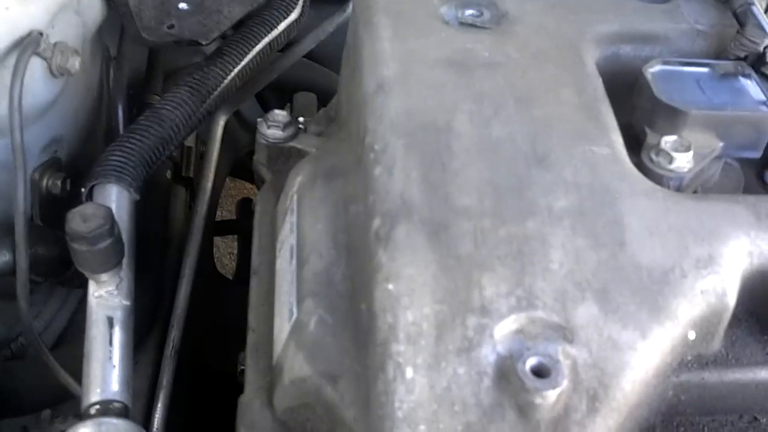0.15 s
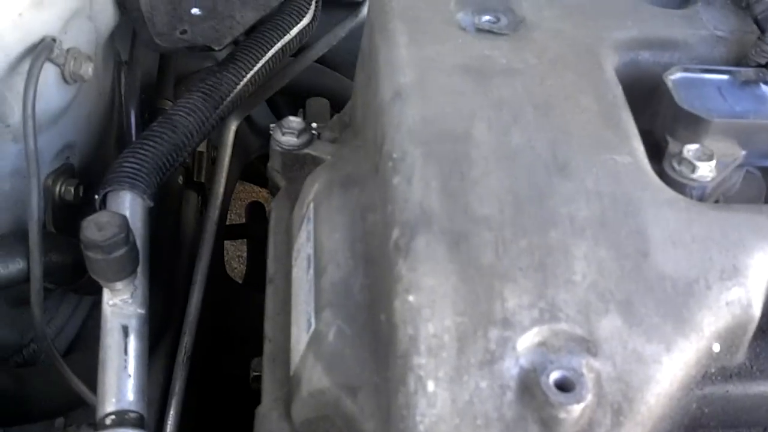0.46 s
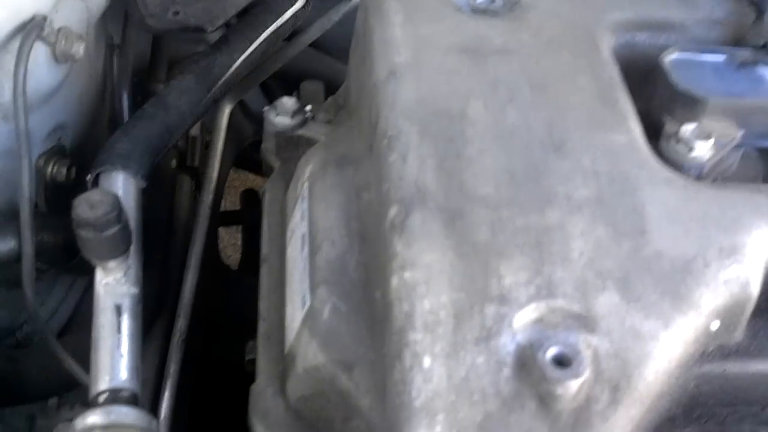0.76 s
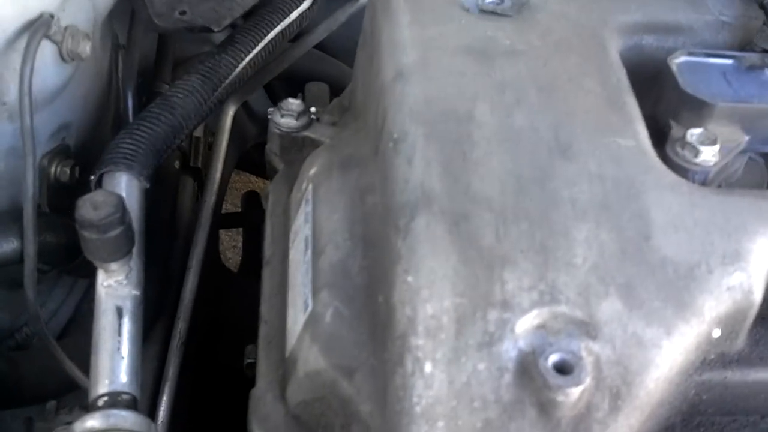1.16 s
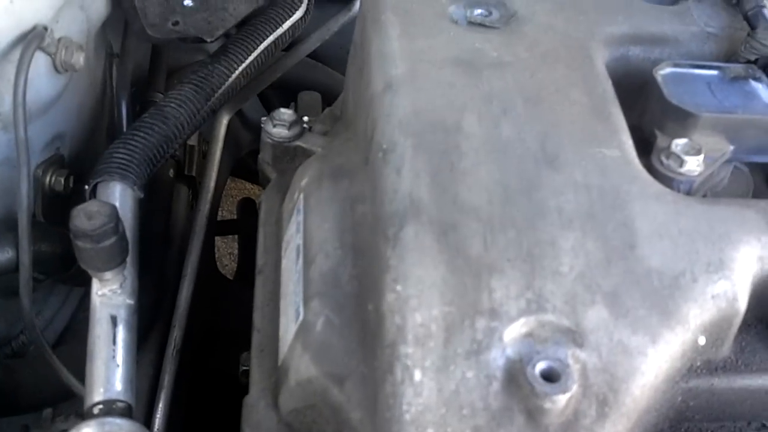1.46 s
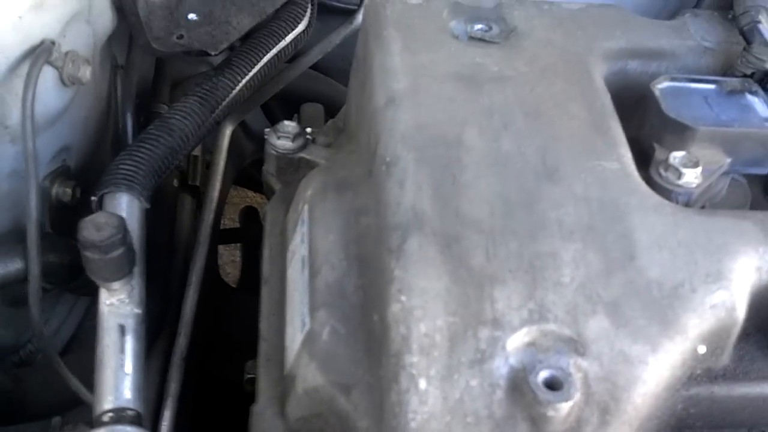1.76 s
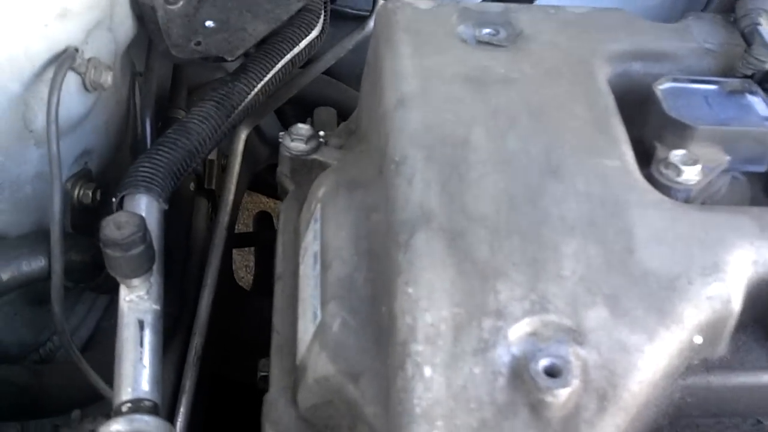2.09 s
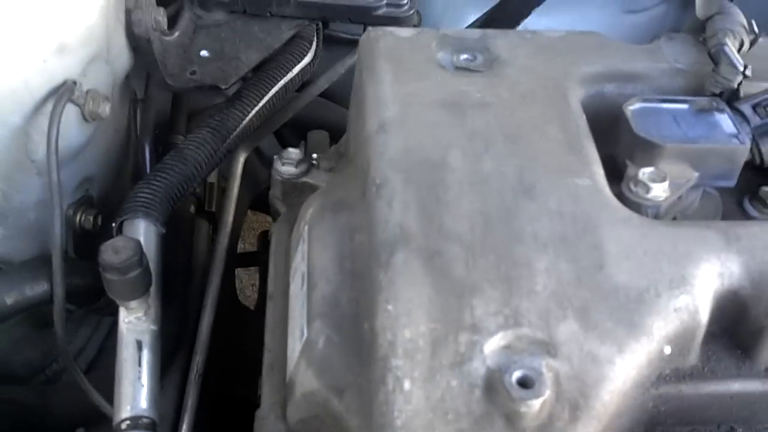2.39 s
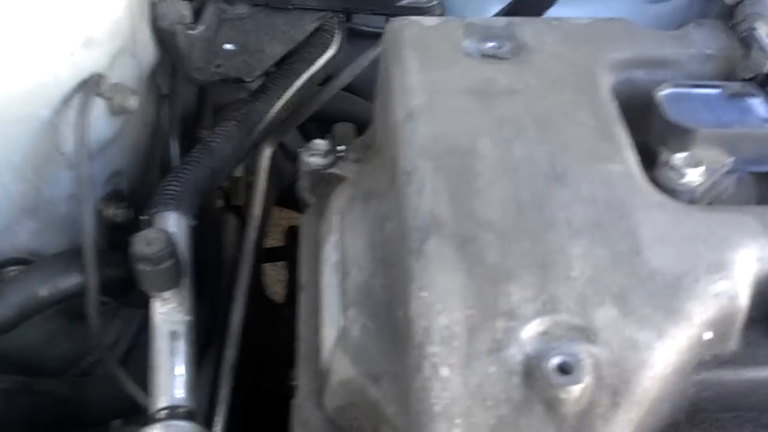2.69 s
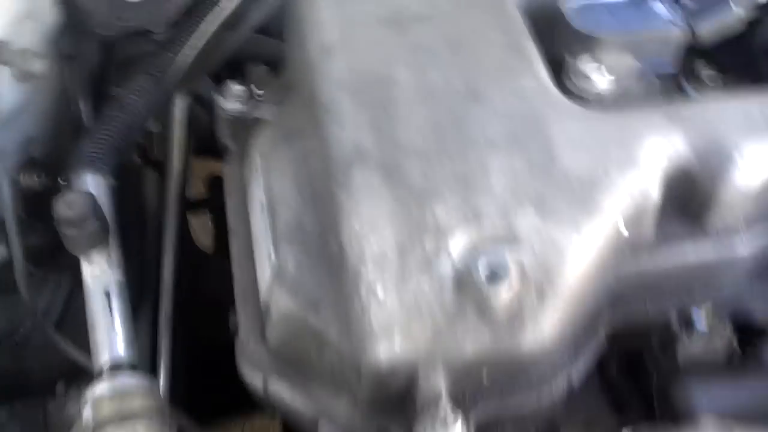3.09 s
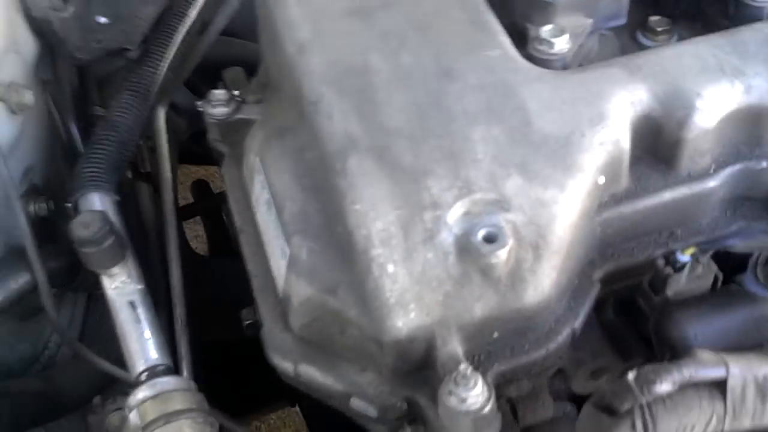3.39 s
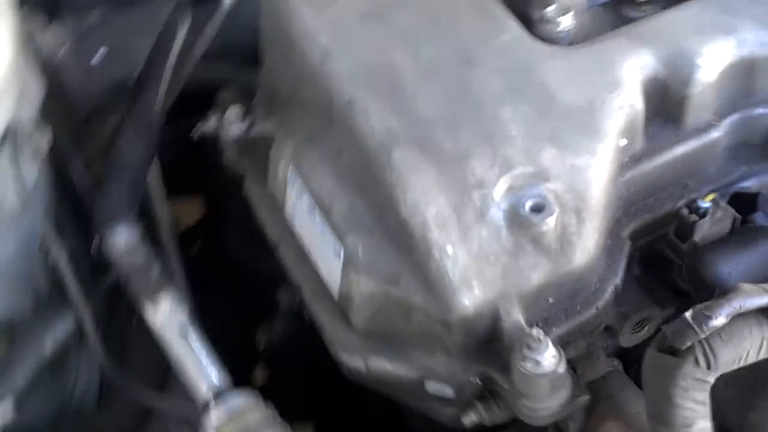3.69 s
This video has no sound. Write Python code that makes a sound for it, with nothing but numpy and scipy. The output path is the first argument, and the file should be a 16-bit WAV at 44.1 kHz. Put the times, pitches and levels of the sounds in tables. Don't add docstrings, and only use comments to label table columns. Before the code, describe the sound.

A car engine knocks rapidly and regularly, slowing to idle amid valve clatter and a faint hiss.

```python
import sys
import numpy as np
from scipy import signal
from scipy.fft import rfft, irfft
from scipy.io import wavfile
from scipy.ndimage import uniform_filter1d, minimum_filter1d

SR = 44100
rng = np.random.default_rng(int(sys.argv[2]) if len(sys.argv) > 2 else 0)


def boost_factor(decibels):
    exponent = np.asarray(decibels, float) / 20
    return 10 ** exponent


def int16_out(signal):
    q = np.round(np.clip(np.atleast_2d(signal).T, -1, 1) * 32767)
    wavfile.write(sys.argv[1], SR, q.astype(np.int16))


N = 169785

# [t/s, level/dB]
SHAFT_KNOCKS = [(0.0024, -15), (0.0431, -19.5), (0.0809, -16), (0.1179, -17), (0.1584, -18),
                (0.1989, -16.5), (0.2389, -14.5), (0.2826, -16.5), (0.3656, -33), (0.4033, -22.5),
                (0.4436, -17.5), (0.4864, -17.5), (0.5288, -16.5), (0.571, -15), (0.613, -16),
                (0.6577, -15.5), (0.7024, -16.5), (0.7486, -16), (0.7962, -16.5), (0.8426, -15.5),
                (0.8915, -15), (0.9414, -25), (0.9932, -15.5), (1.046, -20), (1.095, -14),
                (1.1486, -21.5),
                (1.2025, -22), (1.2579, -25), (1.3127, -17), (1.3703, -16.5), (1.4249, -16),
                   (1.4799, -15.5), (1.5385, -17), (1.6008, -20.5), (1.6564, -18.5), (1.7102, -18),
                   (1.7758, -16), (1.8368, -19), (1.9, -18.5), (2.0145, -15.5), (2.078, -16), (2.142, -19),
                   (2.2584, -22.5), (2.317, -15), (2.378, -15), (2.4389, -17.5),
                (2.5568, -14), (2.6116, -13), (2.6749, -20), (2.732, -19), (2.795, -16), (2.8484, -13.5),
               (2.9138, -15.5), (2.9742, -15.5), (3.0908, -14.5), (3.149, -15), (3.2096, -15.5),
               (3.3271, -16), (3.385, -13), (3.445, -16.5), (3.506, -16), (3.569, -25.5), (3.622, -13.5),
               (3.681, -20), (3.7406, -25.5), (3.7991, -15.5)]
# [t/s, level/dB]
RATTLE_BLOWS = [(0.261, -46), (0.3078, -18), (0.3905, -46), (1.189, -54), (1.9397, -16), (1.9897, -36),
                (2.1781, -15), (2.2433, -48), (2.4138, -12), (2.4844, -16), (2.6476, -11.5), (2.7152, -29),
                (2.8313, -43), (2.894, -54), (2.9534, -22.5), (3.015, -4.5), (3.25, -7), (3.2674, -9.5),
                (3.315, -30), (3.5454, -13.5), (3.6622, -29), (3.716, -18), (3.7793, -15.5)]
# [delay t/s, level/dB]
BLOW_CONTACTS = [
    (0, 0),
    (.0039, -16),
    (.0085, -18),
]
# [f/Hz, level/dB, t60/s, sign of first swing/1]
BLOCK_MODES = [(513, -7.5, 0.097, 1), (682.5, -15, 0.086, 1), (801, -12, 0.081, 1),
               (1021.7, -5.5, 0.059, 1), (1245.5, -12, 0.079, 1), (1324, -1, 0.047, 1),
               (1525, -3.5, 0.094, -1), (1597, -2, 0.1, 1), (1747.4, 6.5, 0.031, 1), (1980, 1.5, 0.049, 1),
               (2350, -4, 0.04, 1)]
# [f/Hz, level/dB, t60/s, sign of first swing/1]
COVER_MODES = [(3220, -8, .04, 1), (3680, -7, .04, 1), (3950, -9, .03, 1), (6900, -1, .025, 1),
               (7450, 7, .008, 1), (8150, -2, .035, 1), (8890, -7, .03, 1)]
# [f/Hz, level/dB]
CRACK_SPECTRUM = [(300, -45), (1600, -18), (2400, -18), (3000, -24), (6000, -28), (7600, -13), (10500, -38),
                  (15600, -36)]
# [f/Hz, level/dB per Hz]
WASH_SPECTRUM = [(50, -80), (130, -23), (420, -10.5), (1700, -3), (3000, -11.5), (5800, -15), (7500, -25.5),
                 (11000, -21.5)]
# [t/s, rate/turns per s]
SHAFT_SPEED = [
    (0, 25.5),
    (.5, 24.2),
    (.75, 21.3),
    (1, 19.6),
    (1.3, 18),
    (1.6, 16.9),
    (3.85, 16.9),
]
# [order/1, level/dB]
SHAFT_ORDERS = [(4, -70.5), (5, -64), (6, -64), (7, -60.5), (9, -61.5), (13, -74)]
# [t/s, level/dB, left over right/dB]
MIC_PATH = [
    (0, 4.5, -1),
    (.35, 0, -0.5),
    (.9, 0.5, -0.5),
    (1.5, -2.5, -1),
    (2.2, -3.5, -0.5),
    (2.6, -1.5, -1.5),
    (3.1, -2, -1.5),
    (3.85, -5, -2),
]
# [t/s, high hiss level/dB, low hiss level/dB]
LEAK_FACING = [
    (0, -38, 0),
    (1.15, -10, -5),
    (1.45, -6, -5),
    (2.3, -5, -5.5),
    (2.45, -1.5, -0.5),
    (2.7, 0.5, 0),
    (3.2, -2, -0.5),
    (3.85, -1.5, -2.5),
]
# [f/Hz, lead/half turns]
PORT_LEAD = [(1350, 0), (2150, .85), (2850, 1.2), (3600, 2), (4800, 3), (6700, 4), (10000, 7), (15500, 11)]
# [f/Hz, coherence/1]
PORT_COHERENCE = [(100, 0.41), (350, 0.25), (500, 0.89), (1300, 0.92), (3600, 0.7), (4800, 0.6),
                  (10000, 0.29), (13000, 0.15)]
# [f/Hz, left over right/dB]
PORT_BALANCE = [(1000, 0.5), (2000, 6.5), (3000, -1.5), (5300, 0.5), (6600, 1), (7800, 4), (9500, 6),
                (12000, -0.5)]
# [f/Hz, level/dB]
WEAKER_MARGIN = [(1000, 12), (2600, 7.5), (4800, 5.5), (7000, 7), (10000, 3.5), (13500, 3.5)]


def evened(x):
    return x / np.sqrt(np.mean(x ** 2) + 1e-20)


def read(points, hz):
    f, value = np.transpose(points)
    return np.interp(np.log(hz + 1), np.log(f + 1), value)


def curve(points, column):
    columns = np.transpose(points)
    return np.interp(np.arange(N) / SR, columns[0], columns[column])


def coloured(points, shape):
    spectrum = rfft(rng.standard_normal(shape))
    gain = boost_factor(read(points, np.fft.rfftfreq(shape[-1], 1 / SR)))
    return evened(irfft(spectrum * gain, shape[-1]))


def band(hz, width_hz):
    spectrum = rfft(rng.standard_normal((2, N)))
    detuning = (np.fft.rfftfreq(N, 1 / SR) - hz) / width_hz
    return evened(irfft(spectrum / (1 + detuning ** 2), N))


def rings(modes, damp=1, scatter=0):
    t, out = np.arange(4096) / SR, np.zeros((2, 4096))
    for hz, db, t60, way in modes:
        second_phase = np.pi * (2 * scatter * rng.random() - .5)
        swing = np.sin(2 * np.pi * hz * t + [[0], [second_phase]])
        out += np.sign(way) * boost_factor(db - 60 * t / (damp * t60)) * swing
    body_cut = signal.butter(4, 348, "high", fs=SR, output="sos")
    return signal.sosfilt(body_cut, out * np.minimum(t / 0.0014, 1))


def hum():
    idle_db, fan_hz, fan_db = -11, 246, -69.5
    speed = curve(SHAFT_SPEED, 1)
    turns = np.cumsum(speed) / SR
    orders = sum(boost_factor(db) * np.sin(2 * np.pi * (k * turns + rng.random((2, 1)))) for k, db in SHAFT_ORDERS)
    slowed = np.clip((SHAFT_SPEED[3][1] - speed) / 6.6, 0, 1)
    orders *= boost_factor(idle_db * slowed)
    return orders * (1 + 0.1 * band(12.0, 1.2)) + boost_factor(fan_db) * band(fan_hz, 1)


def wash():
    return boost_factor(-33) * coloured(WASH_SPECTRUM, (2, N)) + boost_factor(-70) * band(15400, 500)


def leak():
    high = boost_factor(-42) * band(11990, 350)
    high += boost_factor(-44.5) * band(12150, 17)
    low = band(7000, 430) + boost_factor(-11.5) * band(6810, 79) + boost_factor(-4.5) * band(8590, 520)
    high *= boost_factor(curve(LEAK_FACING, 1)) * boost_factor([[-6], [0]])
    return high + boost_factor(-38.5) * low * boost_factor(curve(LEAK_FACING, 2))


def clatter(cover):
    per_s, spread_db, damp = 660, 3.5, 0.4
    size = boost_factor(spread_db * np.minimum(rng.exponential(1, (2, N)), 5))
    struck = rng.random((2, N)) < per_s / SR
    contacts = size * rng.choice([-1., 1.], (2, N)) * struck
    body = rings(BLOCK_MODES, damp) + cover
    return boost_factor(-46.5) * evened(signal.oaconvolve(contacts, body, axes=1)[:, :N])


def thumps(knocks):
    lag, spread_db, level_db, hz, t60_s = 0.71, 1, -22, 542, 0.021
    s = np.transpose(knocks)[0]
    gaps = np.diff(s)
    gaps = np.minimum(gaps, minimum_filter1d(gaps, size=3) * 1.1)
    train, t = np.zeros(N), np.arange(3000) / SR
    at = np.round((s[:-1] + lag * gaps) * SR).astype(int)
    train[at] = boost_factor(spread_db * rng.standard_normal(len(gaps)))
    envelope = boost_factor(level_db - 60 * t / t60_s) * np.minimum(t / 0.0054, 1)
    return signal.oaconvolve(train, np.sin(2 * np.pi * hz * t) * envelope)[:N]


def blows(rows, block, cover, chatter_s, first_db):
    chatter_db, scatter, cover_spread_db, cover_turn = -14, .12, 1.5, 1.5
    crack_db, crack_t60_s = -16, 0.084
    count, length = len(rows), 6095
    out, t = np.zeros((2, N + length + 1)), np.arange(length) / SR
    turn = curve(MIC_PATH, 2)
    hits = rng.standard_normal((count, 2, 2000)) * np.exp(-t[:2000] / chatter_s)
    hits *= np.sqrt(2 / (chatter_s * SR)) * boost_factor(chatter_db)
    draw = rng.uniform(-1.2, 1, (count, 1 + len(BLOW_CONTACTS)))
    for k, (s, db) in enumerate(BLOW_CONTACTS):
        at = np.round(s * SR * (1 + scatter * draw[:, k])).astype(int)
        hits[np.arange(count), :, at] += boost_factor(db + first_db)
    low = signal.fftconvolve(hits, block[None], axes=2)
    high = signal.fftconvolve(hits, cover[None], axes=2)
    crack = coloured(CRACK_SPECTRUM, low.shape)
    crack *= boost_factor(crack_db + 12.5 - 60 * t / crack_t60_s) * np.minimum(t / .002, 1)
    bright = boost_factor(2 * cover_spread_db * draw[:, -1])
    for k, (s, db) in enumerate(rows):
        at = round(s * SR)
        cover_gain = bright[k] * boost_factor(cover_turn * turn[at])
        blow = low[k] + crack[k] + cover_gain * high[k]
        out[:, at:][:, :length] += boost_factor(db - 28) * evened(blow)
    return out[:, :N]


def knocking(knocks, block, cover):
    main = boost_factor(13.5) * blows(knocks, block, cover, 0.0079, 0)
    return main + boost_factor(4.5) * blows(RATTLE_BLOWS, block, cover, 0.0049, 2.5)


def ports(pair):
    hz = np.fft.rfftfreq(N, 1 / SR)
    a, b = rfft(pair)
    same = np.clip(read(PORT_COHERENCE, hz), 0, 1)
    tilt = boost_factor(read(PORT_BALANCE, hz) / 2)
    lead = np.exp(1j * np.pi * np.interp(hz, *np.transpose(PORT_LEAD)))
    right = same * lead * a + np.sqrt(1 - same ** 2) * b
    return irfft(np.array([a * tilt, right / tilt]), N)


def scene():
    knocks = SHAFT_KNOCKS
    block, cover = rings(BLOCK_MODES), boost_factor(-12) * rings(COVER_MODES, 1, 0.5)
    bed = hum() + wash() + clatter(cover) + thumps(knocks)
    near = boost_factor(curve(MIC_PATH, 1))
    pair = ports(knocking(knocks, block, cover) + bed * near + leak())
    return pair * boost_factor(np.array([[.5], [-.5]]) * curve(MIC_PATH, 2))


def stronger_of_sum_and_difference(x):
    both = np.array([x[0] + x[1], x[0] - x[1]]) / 2
    hz, _, z = signal.stft(both, SR, nperseg=1024, noverlap=768)
    power = uniform_filter1d(uniform_filter1d(abs(z) ** 2, size=4, axis=1), size=8, axis=2)
    rows, columns = np.arange(len(hz)) // 4 * 4, np.arange(z.shape[2]) // 4 * 4
    power = power[:, rows][:, :, columns]
    keep = power > power[::-1] * boost_factor(-2 * read(WEAKER_MARGIN, hz))[:, None]
    keep = keep | (hz < 700)[:, None]
    mid, side = signal.istft(z * keep, nperseg=1024, noverlap=768)[1][:, :N]
    return np.array([mid + side, mid - side])


def roll_off(x):
    return signal.sosfilt(signal.butter(12, 15940, fs=SR, output="sos"), x)


def record(dry):
    low_cut_hz, edge_hz = 90, 15760
    hz = np.fft.rfftfreq(N, 1 / SR)
    bass_cut = np.sqrt(1 + (low_cut_hz / (hz + 1)) ** 4)
    upper_edge = 1 + (hz / edge_hz) ** 400
    shaped = irfft(rfft(dry) / bass_cut / upper_edge, N)
    mix = stronger_of_sum_and_difference(shaped)
    return roll_off(mix)


dry = scene()
out = record(dry)
int16_out(out)
```